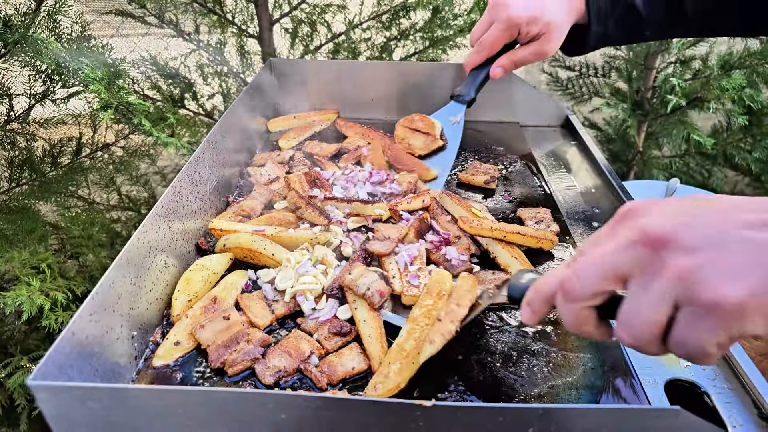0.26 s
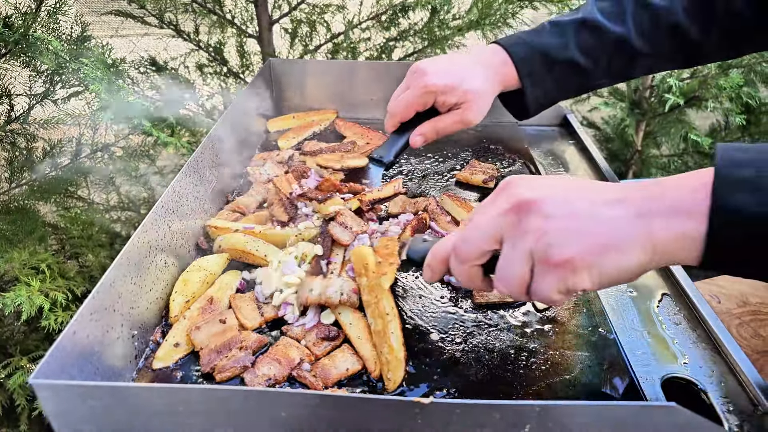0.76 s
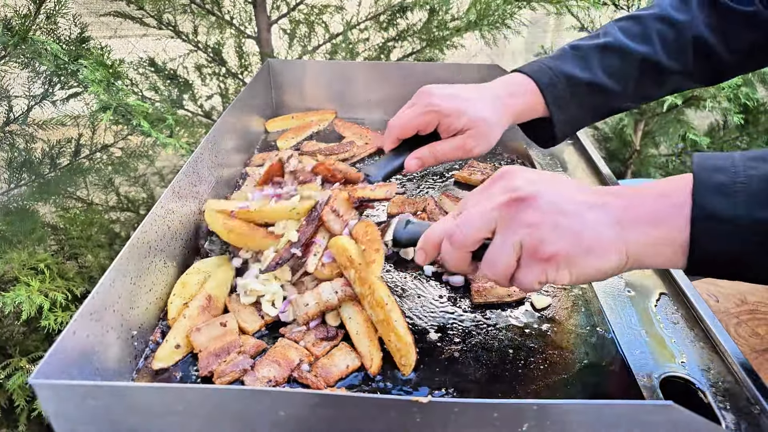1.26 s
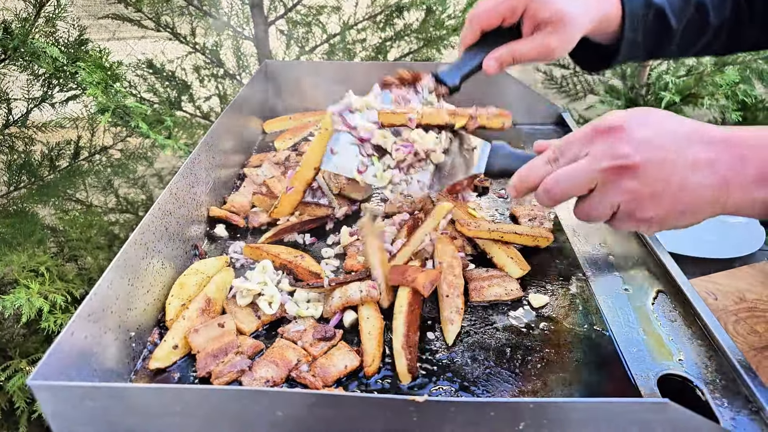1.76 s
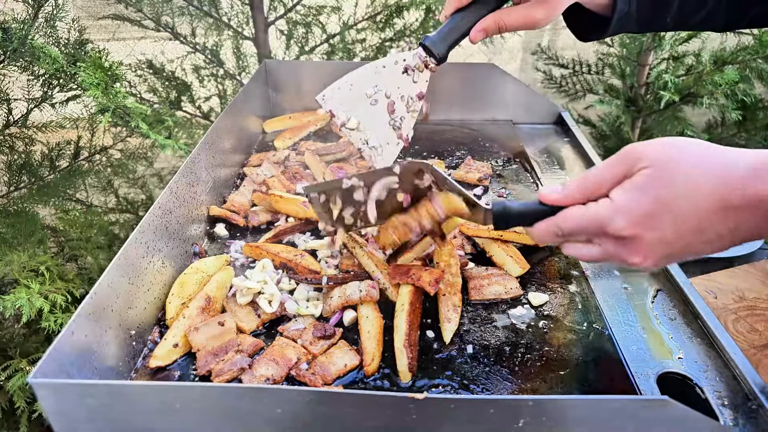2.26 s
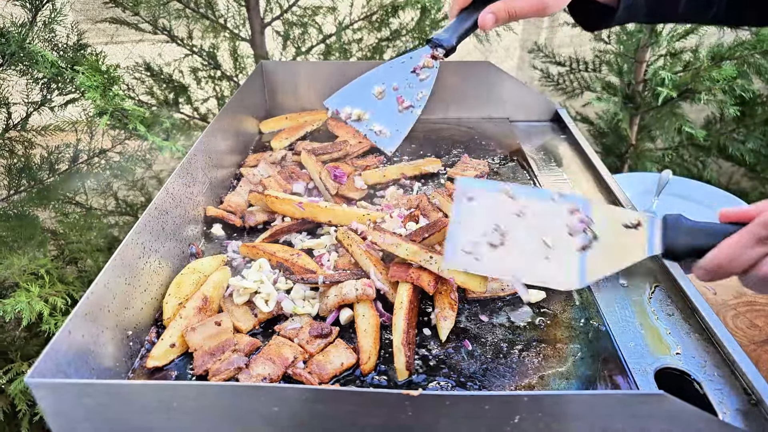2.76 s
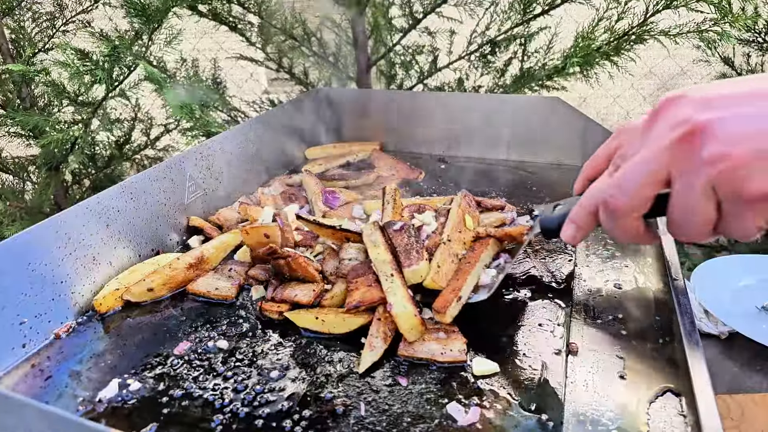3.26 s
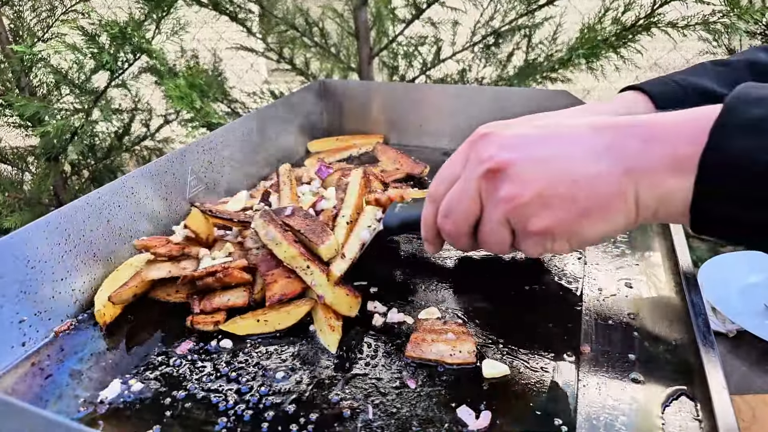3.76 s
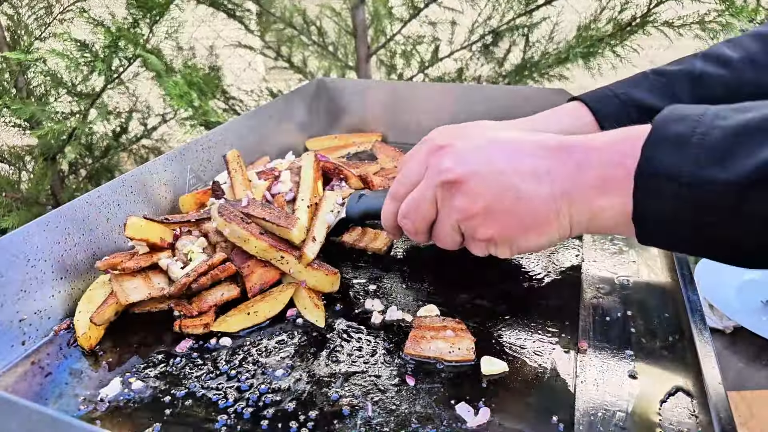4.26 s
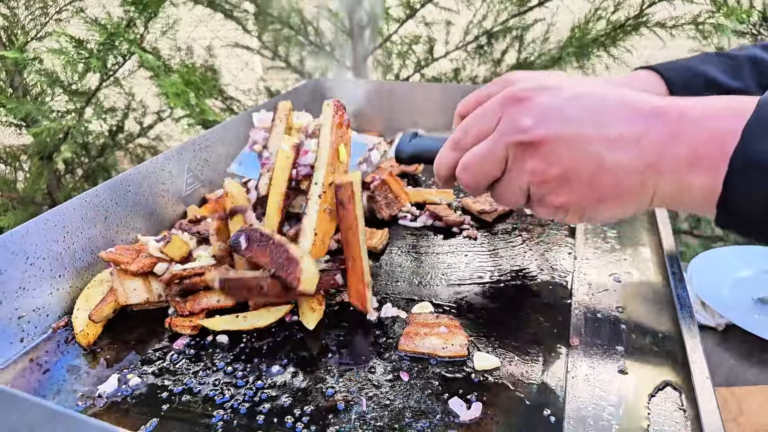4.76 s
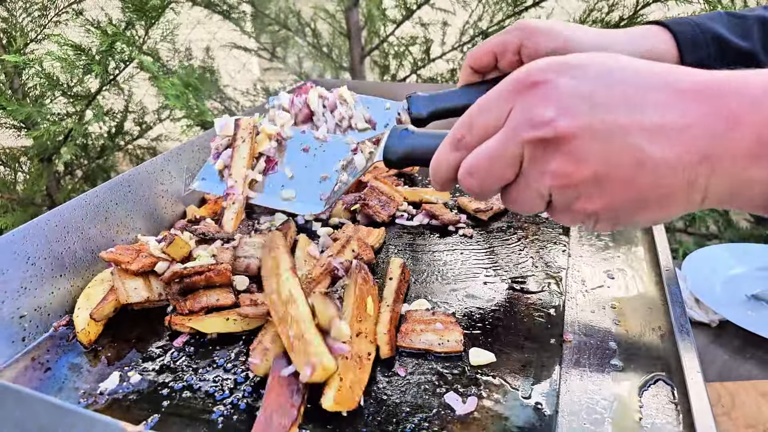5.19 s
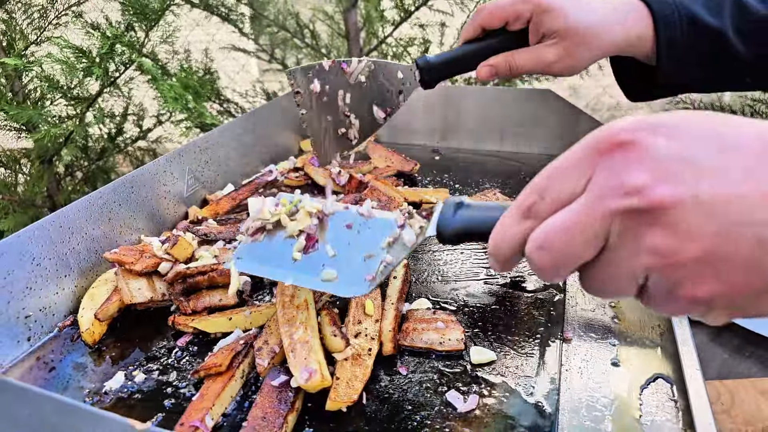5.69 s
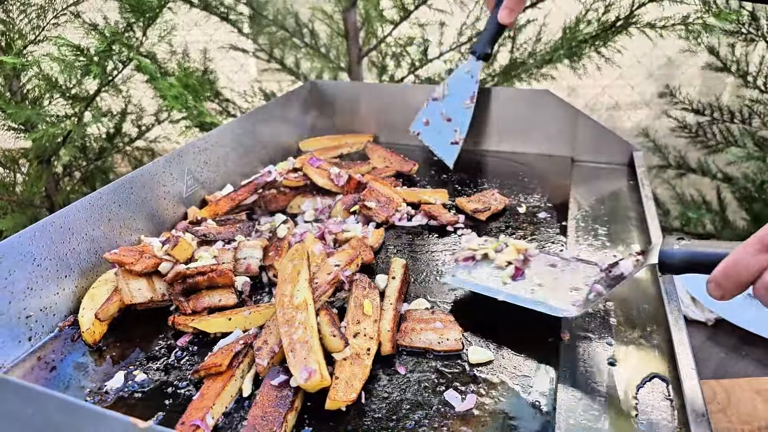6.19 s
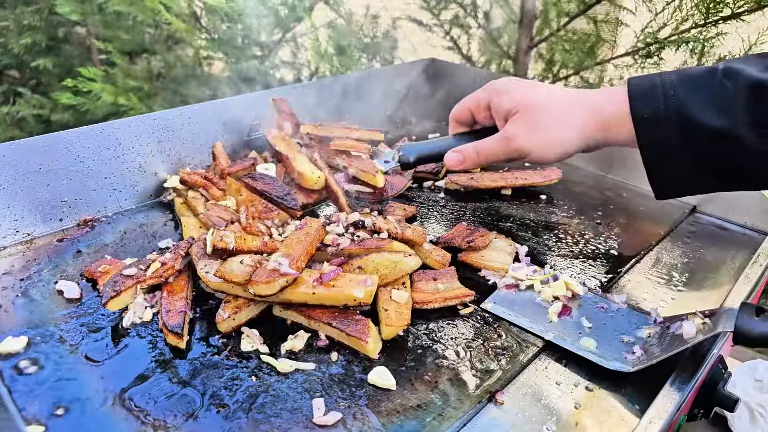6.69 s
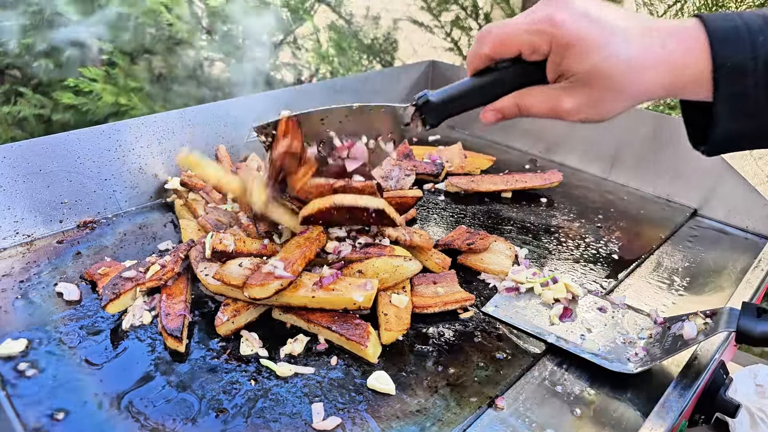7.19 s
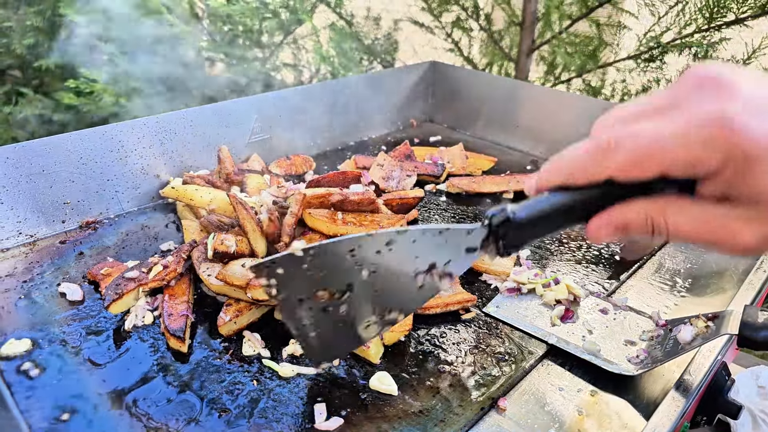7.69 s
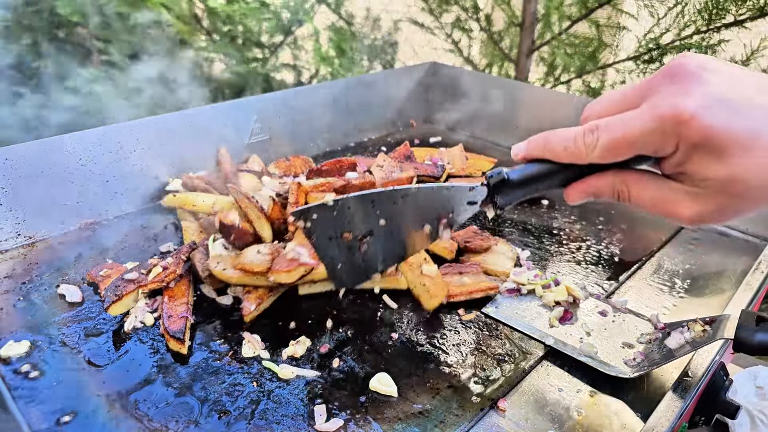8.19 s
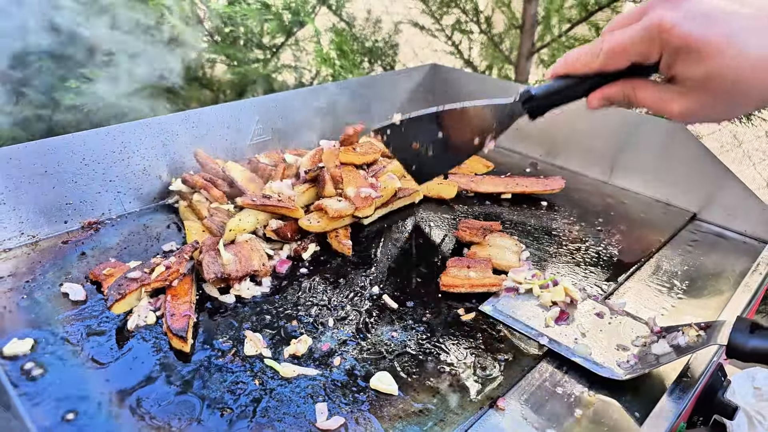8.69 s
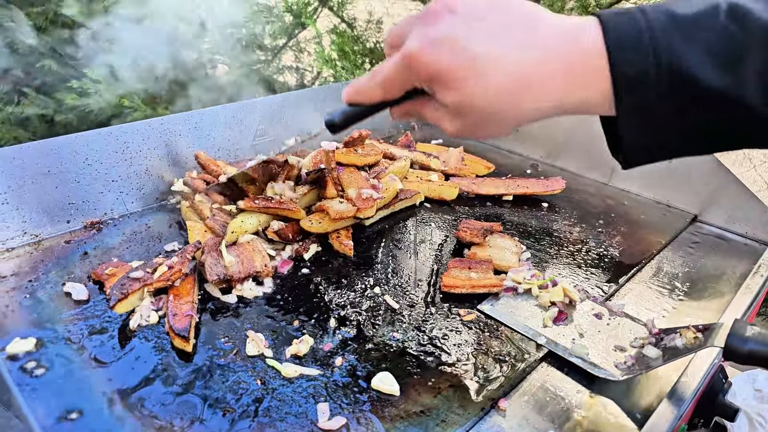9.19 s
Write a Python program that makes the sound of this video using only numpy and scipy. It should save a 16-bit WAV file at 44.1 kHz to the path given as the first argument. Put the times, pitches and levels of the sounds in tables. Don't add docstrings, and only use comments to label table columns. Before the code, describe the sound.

Lively frying crackle with sharp fat pops, low wind thumps in the middle, then a ringing spatula clank and one long metallic scrape.

```python
import sys
import numpy as np
from scipy import signal
from scipy.fft import rfft, irfft, next_fast_len
from scipy.io import wavfile
from scipy.ndimage import uniform_filter1d

SR = 44100
rng = np.random.default_rng(int(sys.argv[2]) if len(sys.argv) > 2 else 0)


def rack_gain(trim_db):
    fader = np.asarray(trim_db, float)
    return 10 ** (fader / 20)


def to_wav(s):
    ch = np.atleast_2d(s).T
    pcm = np.round(np.clip(ch, -1, 1) * 32767)
    wavfile.write(sys.argv[1], SR, pcm.astype(np.int16))


N = 416744
T = np.arange(N) / SR


def evened(x):
    return x / np.sqrt(np.mean(x ** 2) + 1e-20)


def read(points, hz):
    f, value = np.transpose(points)
    return np.interp(np.log(hz + 1), np.log(f + 1), value)


def add(mix, s, sound):
    part = mix[round(s * SR):][:len(sound)]
    part += sound[:len(part)]


def resonate(x, hz, width):
    return signal.lfilter(*signal.iirpeak(hz, hz / width, SR), x)


def band(x, order, low_hz, high_hz):
    return signal.lfilter(*signal.butter(order, [low_hz, high_hz], "band", fs=SR), x)


def shaped(x, gain):
    size = next_fast_len(N)
    return irfft(rfft(x, size) * gain(np.fft.rfftfreq(size, 1 / SR)), size)[..., :N]


def slow(shape, size):
    return evened(uniform_filter1d(uniform_filter1d(rng.standard_normal(shape), size), size))


def flares(count, per_step, fall):
    kicks = rng.uniform(.3, 1, count) * (rng.random(count) < per_step)
    flare = np.tanh(signal.lfilter([1], [1, -np.exp(-1 / fall)], kicks))
    return evened(flare - flare.mean())


# (fade out starts [s], silent [s], fade in starts [s], full [s])
JOINS = [
    (3.1215, 3.130, 3.148, 3.156),
    (6.389, 6.396, 6.3965, 6.404),
]


def moments(t):
    return np.searchsorted([join[1] for join in JOINS], t)


def swells(rows):
    t = T[::64]
    power = 0
    for s, length_s, db in rows:
        bell = np.exp(-(2 * (t - s) / length_s) ** 2 * 2)
        power = power + rack_gain(2 * db) * bell * (moments(t) == moments(s))
    return np.interp(T, t, np.sqrt(power))


# (frequency [Hz], level [dB per Hz])
WIND_COLOUR = [(15, -64), (30, -9), (55, 0), (92, 0.5), (200, -6.5), (385, -19), (580, -22), (990, -109)]
BREEZE = [-61, -46.5, -59.5]
# (middle [s], length [s], level [dB])
GUSTS = [(1.9, 0.26, -52), (2.8, 0.13, -54), (2.95, 0.1, -46), (3.2, 0.04, -35), (3.33, 0.22, -35.5),
         (3.51, 0.11, -38), (3.7, 0.063, -40), (3.78, 0.073, -39), (3.93, 0.031, -47), (4.12, 0.034, -38),
         (4.22, 0.022, -40), (4.35, 0.065, -36.5), (4.6, 0.13, -37), (4.8, 0.08, -31), (4.98, 0.24, -38.5),
         (5.15, 0.42, -34.5), (5.33, .1, -53), (5.52, 0.22, -32.5), (5.67, 0.062, -30), (5.82, 0.028, -41),
         (5.95, 0.19, -32), (6.15, 0.46, -35.5), (6.29, 0.047, -33), (6.37, 0.033, -43), (6.6, 0.21, -46.5),
         (7.0, 0.58, -52), (8.2, 1, -55), (7.55, 0.23, -52)]
# (time [s], level [dB], pitch [Hz])
BUFFETS = [
    (3.325, -7, 99.6),
    (4.106, -25, 78.1),
    (4.217, -10, 87.5),
    (4.818, -1, 92),
    (5.099, -45, 91.5),
    (5.176, -5, 141),
    (5.497, -11, 105),
    (6.298, 0, 138),
    (6.36, -33, 144),
]


def wind():
    lumps = rng.standard_normal(N) * rack_gain(3.5 * slow(N // 64 + 2, size=14).repeat(64)[:N])
    air = evened(shaped(lumps, lambda hz: rack_gain(read(WIND_COLOUR, hz))))
    out = rack_gain(-3) * np.hypot(rack_gain(np.take(BREEZE, moments(T))), swells(GUSTS)) * air
    for s, db, hz in BUFFETS:
        turns = hz * T[:3000]
        add(out, s, rack_gain(db - 11) * np.sin(2 * np.pi * turns) * np.e * turns * np.exp(-turns / 0.32))
    return out


# (time [s], peak [dB], pitch [Hz])
FLUTTERS = [(3.183, -25, 129), (3.308, -21, 105), (3.674, -38, 88.8), (3.76, -31, 88.8), (3.912, -33, 67.3),
            (4.105, -29, 80.7), (4.198, -26, 88.8), (4.328, -29, 72), (4.538, -29, 119), (5.08, -21.5, 98),
            (5.167, -24, 186), (5.437, -29, 121), (5.457, -22.5, 96.9), (5.794, -29, 122),
            (5.905, -37, 110), (6.285, -24.5, 86.1), (6.364, -26, 144)]


def flutters():
    out = np.zeros(N)
    for s, db, hz in FLUTTERS:
        turns = hz * T[:4000] / 1.3
        swing = np.sin(2 * np.pi * hz * T[:4000])
        add(out, s, rack_gain(db - 10) * swing * np.e * turns * np.exp(-turns))
    return out


def stick_slip(per_s, count):
    slips = (rng.random(count) < per_s / SR) * np.minimum(rng.exponential(1, count), 2)
    return rng.standard_normal(count) * (.5 + 1.5 * slips)


# (frequency [Hz], level [dB], t60 [s])
PLATE = [(198, 2.5, 0.19), (222.4, -0.5, 0.66), (348.5, -3, 0.57), (422, -44, 0.26), (751, -5.5, 0.15)]
# (middle [s], length [s], level [dB])
DRAGS = [
    (.06, 0.32, -51),
    (.29, 0.27, -49.5),
    (.51, 0.11, -50),
    (.61, 0.069, -51),
    (.75, 0.37, -53.5),
    (1.58, 0.084, -47),
    (1.74, 0.099, -44),
    (1.92, 0.14, -42),
    (2.47, 0.13, -66),
]
# (middle [s], length [s], level [dB])
HUMS = [
    (6.6, .2, -54),
    (6.95, 0.94, -64.5),
    (7.65, 0.4, -51.5),
    (8.05, 0.66, -47),
    (8.5, .3, -64),
    (8.98, 0.32, -62),
]


def plate_rumble():
    slips = stick_slip(per_s=1200, count=N)
    plate = sum(rack_gain(db) * resonate(slips, hz, 2.8 / t60) for hz, db, t60 in PLATE)
    hum_hz = 164.8
    hum = resonate(resonate(rng.standard_normal(N), hum_hz, 6), hum_hz, 8)
    return swells(DRAGS) * evened(plate) + swells(HUMS) * evened(hum)


# (start [s], end [s], pitch [Hz], width [Hz], level [dB])
WHISTLES = [
    (3.17, 3.46, 7250, 250, -39),
    (3.72, 4.18, 1340, 260, -46.5),
    (5.4, 5.85, 5130, 900, -37.5),
    (5.45, 5.8, 7900, 1200, -33),
]
JETS = [(.03, .4, 2200, 350, -42), (.36, .78, 3900, 500, -44), (3.53, 3.76, 7350, 300, -42),
        (3.33, 3.95, 5600, 500, -44), (3.45, 3.56, 7850, 250, -43), (4.08, 4.62, 7250, 300, -48),
        (3.7, 4.22, 1800, 1100, -47), (6.92, 7.3, 1820, 100, -53), (8.03, 8.16, 5400, 1500, -37),
        (8.2, 8.3, 5550, 300, -44), (6.9, 7.35, 760, 60, -60), (4.3, 4.6, 8500, 300, -52)]


def steam_jets():
    out = np.zeros(N)
    for start, end, hz, width, db in WHISTLES + JETS:
        jet = rng.standard_normal(round((end - start) * SR))
        whistle = evened(resonate(resonate(jet, hz, width), hz, width))
        add(out, start, rack_gain(db) * whistle * np.sqrt(np.hanning(len(jet))))
    return out


def struck(table, modes):
    out, t = np.zeros(N), T[:SR * 2 // 3]
    for s, ring_db, thud_db, top_hz, thud_t60 in table:
        ring = 0
        for hz, db, t60 in modes:
            swing = np.sin(2 * np.pi * (hz * t + rng.random()))
            ring = ring + rack_gain(db - 60 * t / t60) * swing * np.minimum(hz * t / 1.5, 1)
        thud = evened(band(rng.standard_normal(len(t)), 3, max(170, top_hz / 3.7), top_hz))
        hit = rack_gain(ring_db) * ring + rack_gain(thud_db - 60 * t / thud_t60) * thud
        add(out, s, hit * np.minimum(t / 0.00072, 1))
    return signal.lfilter(*signal.butter(2, 130, "high", fs=SR), out)


# (frequency [Hz], level [dB], t60 [s])
BLADE = [(210, -5, .22), (345, -3, .25), (409, -6, .19), (533, -6, .4), (732, 0, .42), (810, -2, .38),
         (985, -8, .19), (1141, -4, .23), (1507, -6, .16), (1771, -4, .1), (1873, -15, .25),
         (1997, -2, .11), (2358, -14, .2), (2509, -16, .2), (2745, -10, .15), (2977, -16, .2),
         (3165, -9, .1)]
TAP_A = [(288, 0, 1.3)]
TAP_C = [(399, 2, 0.43), (720, -2, 0.13)]
TICK = [(1130, 4.5, 0.14), (753, -2, 0.15), (2060, 12, 0.059), (1650, 3, .06)]
# (time [s], ring [dB], thud [dB], thud top [Hz], thud t60 [s])
CLANK = [
    (7.7395, -24, -17.5, 2700, 0.072),
    (7.742, -60, -28, 1700, 0.43),
    (7.745, -91, -36, 297, 1),
    (8.974, -54, -33.5, 1500, 0.06),
]
REBOUNDS = [
    (7.786, -37, -40, 2620, 0.046),
    (7.848, -38.5, -42, 2400, 0.087),
]
KNOCKS_A = [
    (.799, -70, -41, 800, .03),
]
TAPS_A = [
    (.776, -42.5, -45, 900, .06),
    (1.105, -70, -46, 900, .12),
]
KNOCKS_C = [
    (6.462, -45, -38.5, 2410, 0.18),
]
TAPS_C = [
    (6.452, -67, -47, 520, 0.22),
    (6.562, -50, -46, 480, 0.11),
    (6.715, -54, -56, 500, 0.11),
]
TICKS = [
    (6.629, -42.5, -40, 2400, .08),
]
KNOCKS_PLATE = [
    (1.848, -38, -34, 570, 0.12),
    (1.8, -57, -46, 550, 0.076),
    (2.43, -51.5, -41, 870, 0.11),
]
KNOCKS_LATE = [
    (1.884, -38.5, -38, 1100, 0.086),
    (1.2, -51.5, -46, 600, .06),
]


def knocks():
    out = struck(CLANK + REBOUNDS, BLADE) + struck(KNOCKS_PLATE + KNOCKS_LATE, PLATE)
    out += struck(KNOCKS_A + TAPS_A, TAP_A) + struck(KNOCKS_C + TAPS_C, TAP_C)
    return out + struck(TICKS, TICK)


def steadied(x):
    swelling = abs(signal.hilbert(x, next_fast_len(len(x)))[:len(x)])
    return evened(x / (swelling + .2) ** 0.52)


# (frequency [Hz], width [Hz], level [dB])
SCRAPE = [(352, 5.9, 5), (406, 8.1, -4), (738.5, 6.3, 9.5), (930, 100, -3), (1043, 40, -2), (1080, 30, -24),
          (1470, 62, 5), (1820, 70, 10.5), (2310, 77, -26)]
# (time [s], drag [dB], freedom to sing [dB], edge pressure [dB], tip chatter [dB])
STROKE = [(7.84, -45, 3, -11, -4), (7.98, -46.5, -29, -32, -17), (8.03, -47, 3, 5, 0),
          (8.07, -45.5, 3, 7, -6), (8.12, -41, -8, -1, -6), (8.155, -40, -17, -19, -14),
          (8.2, -44.5, -2, 5, -4), (8.245, -37, -5, 8, -12), (8.29, -38.5, -11, 11, -9),
          (8.37, -42, -1, 11.5, -5), (8.45, -41.5, 1, 8, 1), (8.5, -48, 3, 4, 2), (8.55, -45, 1, 0, -1),
          (8.585, -53, -3, 4, 6), (8.62, -52, 5, 10, 4), (8.67, -59, -4, 2, 0), (8.72, -66, -10, 6, 0)]


def scraping():
    s, *columns = np.transpose(STROKE)
    t = np.arange(s[0], s[-1], 1 / SR)
    db, free_db, press_db, tip_db = (np.interp(t, s, c) for c in columns)
    slips = stick_slip(per_s=2200, count=SR * 2)[:len(t)]
    stroke = rack_gain(-4.5) * evened(band(slips, 2, 150, 1300))
    lifts = [0, 0, free_db] + [press_db] * 3 + [tip_db] * 3
    for (hz, width, mode_db), lift in zip(SCRAPE, lifts):
        stroke = stroke + rack_gain(lift + mode_db - 7.5) * steadied(evened(resonate(slips, hz, width)))
    out = np.zeros(N)
    add(out, s[0], rack_gain(db) * stroke * np.minimum((t - s[0]) / 0.0077, 1))
    return out


def walls(length_s, first, fall_db):
    t = T[:round(.012 * SR)]
    taps = rng.standard_normal(len(t)) * rack_gain(-fall_db * t / length_s)
    taps *= np.clip((length_s - t) / .0007, .1, 1)
    taps[:2] += first * np.array([1, -.5])
    return taps / abs(taps).max()


# (time [s], peak [dB], pitch [Hz])
POPS = [(0.099, -17, 2090), (0.269, -24, 3820), (1.692, -21, 3770), (2.031, -20, 2150), (3.521, -26, 2240),
        (3.792, -27, 2370), (3.835, -25, 3840), (3.873, -23, 1280), (3.896, -20, 1370), (3.909, -24, 1230),
        (3.939, -31, 1340), (3.967, -17, 2970), (3.984, -20, 2960), (4.019, -25, 3590), (4.09, -19, 2490),
        (4.129, -24, 3530), (4.162, -17, 3590), (4.212, -24, 3060), (4.292, -23, 3560), (6.524, -23, 2170),
        (6.659, -18, 2280), (8.241, -15, 1040), (8.395, -22, 1110), (8.989, -19, 3940)]


def pops():
    out, t = np.zeros(N), T[:700]
    for s, db, hz in POPS:
        turns = hz * t
        snap = 0.65 * np.gradient(rng.standard_normal(len(t))) * np.exp(-t / .0015)
        ring = np.sin(2 * np.pi * turns) * np.exp(-turns / 3)
        add(out, s, rack_gain(db - 4) * (ring + snap) * np.minimum(turns, 1))
    return out


# rate [per s], then level [dB]
CRACKS_PER_S = [20, 20, 22]
CRACK_LEVEL = [-25, -26, -28]


def cracks():
    moment = moments(T)
    size = rack_gain(3.7 * np.minimum(rng.exponential(1, N), 3))
    size *= rng.random(N) < np.take(CRACKS_PER_S, moment) / SR
    snap = band(walls(.004, 9, 14), 1, 1800, 11000)
    return signal.oaconvolve(size * rack_gain(np.take(CRACK_LEVEL, moment)), snap / abs(snap).max())[:N]


# (time [s], peak [dB], centre [Hz])
SNAPS = [(4.4614, -15, 5300), (4.5532, -14, 4300), (4.6526, -15, 3400), (4.707, -21, 5500),
         (4.809, -19, 4500), (4.828, -19, 8500), (5.011, -13, 3800), (6.6893, -15, 7100), (6.72, -19, 7000),
         (6.8, -19, 3500), (6.8339, -15, 5700), (6.8868, -17, 6700), (7.0843, -26, 6500),
         (7.1917, -17, 6200), (7.3259, -13, 8800), (7.904, -16.5, 4710), (7.9407, -19, 6500),
         (8.0059, -20, 2800), (8.1294, -12, 9000), (8.2531, -24, 1600), (8.295, -16, 6200),
         (8.8525, -8, 12000), (9.1967, -27, 7800), (0.164, -11, 7500), (.1666, -10, 7000),
         (8.8515, -12, 8000), (8.8538, -10, 8000), (3.194, -17, 3000), (4.94, -20, 7000)]


def snaps():
    out = np.zeros(N)
    for s, db, hz in SNAPS:
        pop = band(walls(.003, 8, 14), 2, hz / 1.5, min(1.5 * hz, 16000))
        add(out, s, rack_gain(db - 2.5) * pop / abs(pop).max())
    return out


# (time [s], peak [dB], centre [Hz], low part [dB relative])
SPITS = [(0.1622, -1.5, 4800, -13.5), (0.705, -15, 6430, -29), (3.191, -17, 2970, -21),
         (3.283, -12.5, 7000, -13), (3.4214, -14, 7330, -24), (3.595, -13, 7150, -11),
         (4.135, -12, 8790, -14), (4.653, -25, 5400, -16), (5.008, -15.5, 2860, -5),
         (5.0215, -16, 5600, -27), (6.2033, -14, 6800, -19), (6.5217, -8, 6740, -25),
         (6.627, -14.5, 6440, -33), (6.694, -25, 7660, -13), (6.8527, -14, 7700, -21),
         (6.9475, -14.5, 4800, -14), (7.238, -16, 6700, -21), (7.5535, -9, 8750, -21),
         (7.6493, -13, 7500, -32), (7.905, -23, 6000, -33), (8.007, -20, 2590, -23),
         (8.019, -17, 5150, -18), (8.13, -11, 5630, -17), (8.137, -11, 6550, -29), (8.245, -13, 6960, -9),
         (8.3569, -15, 9170, -30), (8.379, -9, 8510, -33), (8.655, -18, 12400, -15),
         (8.7046, -12, 10000, -35), (8.8503, -7, 9000, -23)]
# (time [s], peak [dB], centre [Hz])
MORE_SPITS = [(4.163, -15, 6500), (1.246, -48, 9200), (1.302, -14, 8910), (3.2994, -24, 7280),
              (3.987, -16, 7510), (4.0854, -13.5, 7900), (4.5528, -21, 4490), (4.6885, -11, 3600),
              (5.387, -26, 5380), (6.6614, -28, 6400), (6.787, -21, 5540), (7.174, -20, 7040),
              (7.9329, -18, 6270), (8.1085, -18, 9300), (8.1398, -14, 7170), (9.292, -22, 10700)]
CRACKLE = [(8.0744, -17, 7750), (8.0824, -13, 5500), (8.1144, -11, 9300), (8.1864, -18, 8650),
           (8.2144, -29, 3900), (8.2544, -13, 5460), (8.2934, -15, 6880), (8.3094, -16, 6240),
           (8.4124, -26, 5570), (8.4517, -20, 8180), (8.5094, -23, 6420), (8.5594, -13, 7940),
           (8.599, -16, 4450), (8.7344, -17, 6300), (8.7994, -15, 5550), (9.0094, -18, 4060),
           (9.1247, -22, 6600), (9.1954, -19, 7740), (9.2344, -26, 5570)]
CRACKLE_EARLY = [(0.2064, -13, 8690), (0.2444, -11, 9490), (1.0605, -13, 3850), (1.47, -6.5, 7280),
                 (2.034, -13, 7770), (2.1894, -23, 3870), (2.8694, -17, 5800), (3.6394, -13, 7610),
                 (4.6513, -20, 8420), (4.6894, -23, 5770)]


def spits():
    small = [(s, db - 2, hz, -14) for s, db, hz in MORE_SPITS]
    crackle = [(s, db - 2.5, hz, -34) for s, db, hz in CRACKLE + CRACKLE_EARLY]
    out = np.zeros(N)
    for s, db, hz, low_db in SPITS + small + crackle:
        pop = walls(.0054, 3, 9)
        low = band(pop + 3 * (T[:len(pop)] < .0001), 1, 500, 2500)
        high = band(pop, 3, hz / 1.8, min(1.8 * hz, 16000))
        spit = high / abs(high).max() + rack_gain(low_db + 8) * low / abs(low).max()
        add(out, s, rack_gain(db - 4) * spit)
    return out


# (frequency [Hz], level [dB], t60 [s])
HOLLOWS = [(1400, -10, .015), (2320, -11, .026), (2810, -9, .015), (4700, 2, .016), (6400, -1, .014),
           (7700, -4, .012)]
# (time [s], ring [dB], thud [dB], thud top [Hz], thud t60 [s])
BIG_SPIT = [
    (.1617, -13, -70, 2000, .01),
]


def hollows():
    return struck(BIG_SPIT, HOLLOWS)


def bubbles(per_s, spread_db, cycles):
    crowd = rack_gain(1.3 * flares(count=N // 64 + 2, per_step=0.064, fall=5.5)).repeat(64)[:N]
    size = rack_gain(spread_db * np.minimum(rng.exponential(1, N), 5)) * (rng.random(N) < crowd * per_s / SR)
    kind, out = rng.integers(0, 20, N), np.zeros(N)
    for k, hz in enumerate(np.geomspace(700, 15000, num=20)):
        turns = hz * T[:600]
        chirp = np.sin(2 * np.pi * turns * (1 + 0.1 * turns))
        grain = chirp * np.exp(-turns / cycles) * hz / 4000
        echoed = np.convolve(grain, walls(0.0042, 1.5, 12)[:260])
        echoed *= np.linalg.norm(grain) / np.linalg.norm(echoed)
        out += signal.oaconvolve(size * (kind == k), echoed)[:N]
    return out


# (frequency [Hz], level [dB per Hz])
COLOUR_A = [(150, -23), (250, -10.5), (600, -9), (722, -7.5), (978, -13), (2350, -4), (3020, -8),
            (3290, -2), (3960, -1), (4680, -2.5), (7260, 1), (11400, -2.5), (14000, -5)]
COLOUR_B = [(240, -24), (400, -10), (880, -8.5), (991, -21), (1260, -5), (1620, -14.5), (1850, -5),
            (2120, -8), (2350, -6.5), (5320, -3), (12200, -4.5), (14000, -7)]
COLOUR_C = [(120, -45), (200, -26), (275, -14.5), (504, -4), (646, -11), (745, -3.5), (1060, -2.5),
            (1600, -5.5), (1810, 2), (2450, -2), (4990, 1), (9500, 0.5), (12400, -4.5), (14000, -2.5)]
# (fizz less 0.5, body less 1.5,
# bass as given, is the extra change in dB per dB of boil)
FIZZ_FOLLOWS = [0.3, 0.36, 0.43]
BODY_FOLLOWS = [1, 1.25, 0.9]
BASS_FOLLOWS = [.3, 0.2, 1.7]


def frying_colour(hz, moment, change_db):
    colours = [read(c, np.minimum(hz, 13900)) for c in (COLOUR_A, COLOUR_B, COLOUR_C)]
    colour = np.array(colours)[moment].T
    column = hz[:, None]
    follow = np.clip((column - 8500) / 2500, 0, 1) * (np.take(FIZZ_FOLLOWS, moment) - 0.5)
    follow += np.clip((3500 - column) / 1000, 0, 1) * (np.take(BODY_FOLLOWS, moment) - 1.5)
    follow += np.clip((750 - column) / 150, 0, 1) * np.take(BASS_FOLLOWS, moment)
    shape = rack_gain(colour + follow * change_db)
    return shape / np.sqrt((shape[(hz > 3000) & (hz < 9500)] ** 2).sum(0))


# (time [s], level [dB])
BOIL = [
    [(0.0, -30.5), (0.3, -26.5), (0.8, -31), (1.27, -31.5), (1.75, -27), (3.12, -30.5)],
    [(3.16, -28.5), (4.52, -34.5), (4.85, -30), (5.65, -30), (6.39, -33.5)],
    [(6.4, -35), (6.9, -36.5), (7.995, -36), (8.01, -31.5), (8.6, -33), (9.04, -38.5), (9.45, -36.5)],
]
# (time [s], level [dB])
WET_FACES = [(.17, 4), (.59, 2.5), (1.31, 1.5), (1.87, 0.5), (2.03, 1.5), (2.66, 1), (2.97, 1.5), (3.18, 0),
             (3.28, -0.5), (3.59, 1.5), (4.0, -1), (4.65, 3.5), (4.98, 3), (5.4, -1), (5.58, 2),
             (6.948, 0.5), (8.06, -0.5), (8.33, 1.5), (8.853, 6.5)]


def frying():
    sizzle = bubbles(per_s=4500, spread_db=-1.5, cycles=0.71)
    hz, t, grains = signal.stft(sizzle, SR, nperseg=256, noverlap=192)
    grains = grains / np.sqrt(np.mean(abs(grains) ** 2, 1, keepdims=True))
    hiss = (rng.standard_normal(grains.shape) + 1j * rng.standard_normal(grains.shape)) / np.sqrt(2)

    patches = evened(uniform_filter1d(slow(grains.shape, size=30), size=6, axis=0))
    flicker = 0.35 * flares(count=len(t), per_step=0.03, fall=8.2)
    flicker += 0.3 * flares(count=len(t), per_step=0.04, fall=22)
    fall_s = 0.039
    surge = sum(db * (t > s) * np.exp(-np.maximum(t - s, 0) / fall_s) for s, db in WET_FACES)
    drift = uniform_filter1d(slow((len(hz), len(t) // 32 + 1), size=6), size=8, axis=0)
    drift = 0.8 * evened(drift).repeat(32, 1)[:, :len(t)]

    boil_db, moment = np.interp(t, *np.concatenate(BOIL).T), moments(t)
    usual_db = np.array([np.mean(boil_db[moment == m]) for m in range(3)])
    shape = frying_colour(hz, moment, boil_db - usual_db[moment])
    bursting = np.clip(hz[:, None] / 1500 - .25, 0, .65)
    z = (bursting * grains + np.sqrt(1 - bursting ** 2) * hiss) * shape
    z = z * rack_gain(boil_db + 0.78 * patches + drift + flicker + surge)
    return signal.istft(z, SR, nperseg=256, noverlap=192)[1][:N]


def scene():
    air = wind() + flutters()
    steel = plate_rumble() + knocks() + scraping()
    fat = pops() + cracks() + snaps() + spits() + hollows() + frying()
    return np.tile(air + steel + steam_jets() + fat, (2, 1))


def low_pass(x):
    return signal.sosfilt(signal.butter(12, 17110, fs=SR, output="sos"), x)


# (frequency [Hz], level [dB])
MIC = [(25, -11), (40, -2.5), (70, 2), (12500, 0), (14000, 2.3), (15000, 5.3), (15650, 8.3)]


def record(dry):
    edge_hz = 15740
    overloaded = 1.432 * np.tanh(dry / 1.366)
    heard = shaped(overloaded, lambda hz: rack_gain(read(MIC, hz)) * np.clip((edge_hz - hz) / 40, 0, 1))
    fades = np.prod([np.interp(T, join, [1, 0, 0, 1]) for join in JOINS], axis=0)
    return low_pass(heard * fades)


dry = scene()
out = record(dry)
to_wav(out)
```